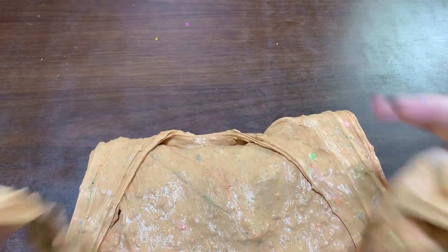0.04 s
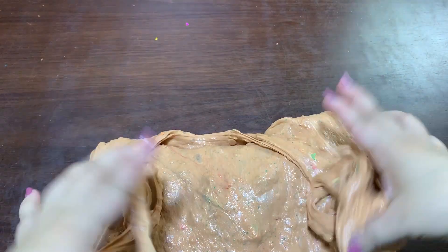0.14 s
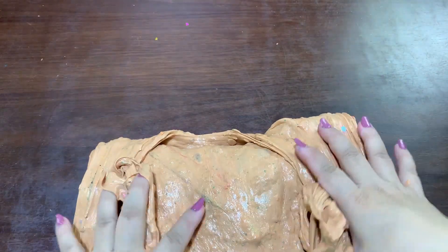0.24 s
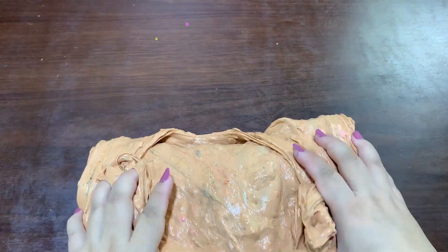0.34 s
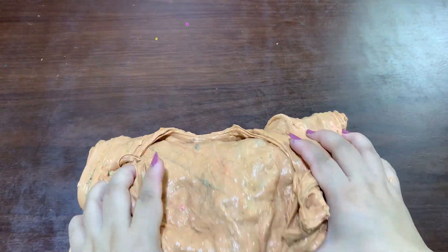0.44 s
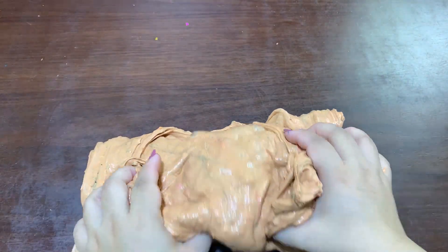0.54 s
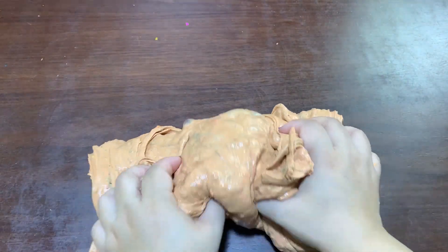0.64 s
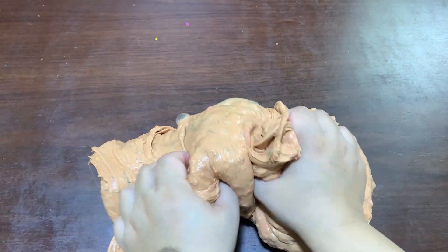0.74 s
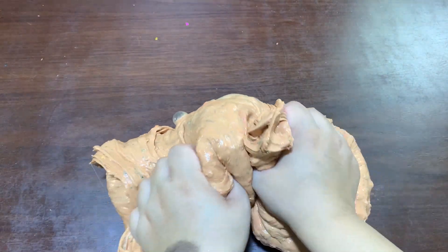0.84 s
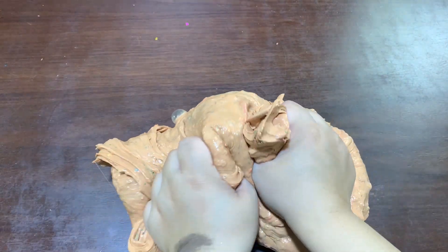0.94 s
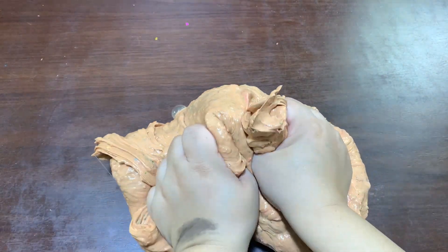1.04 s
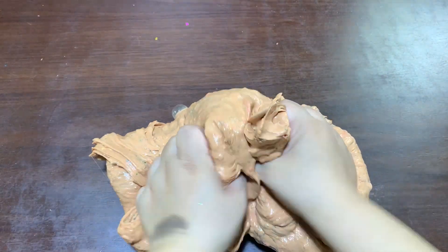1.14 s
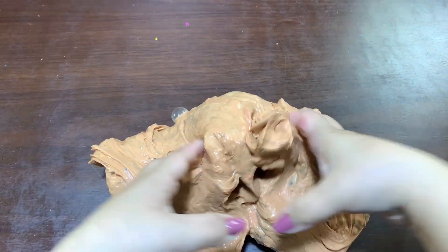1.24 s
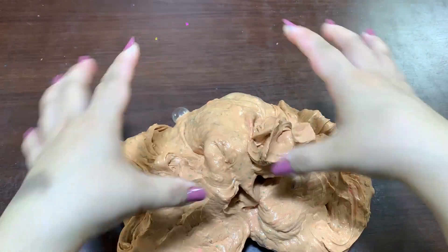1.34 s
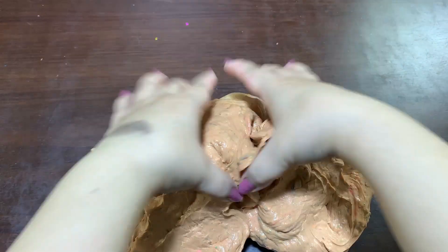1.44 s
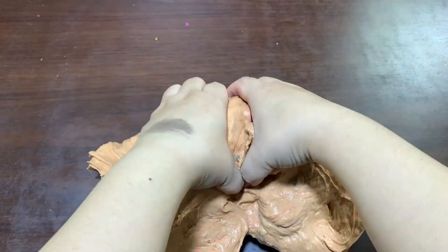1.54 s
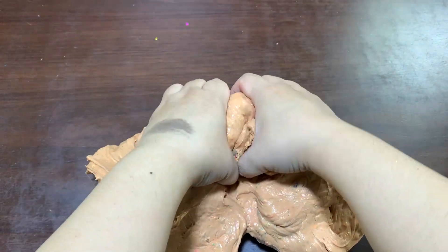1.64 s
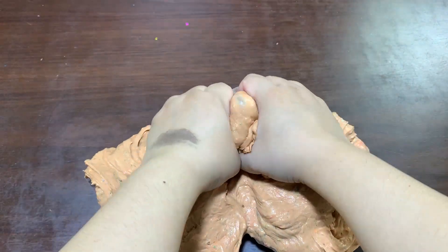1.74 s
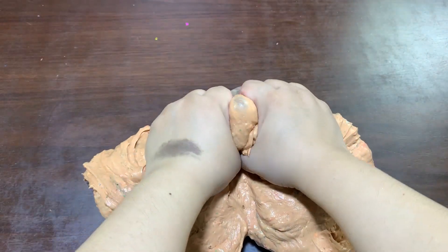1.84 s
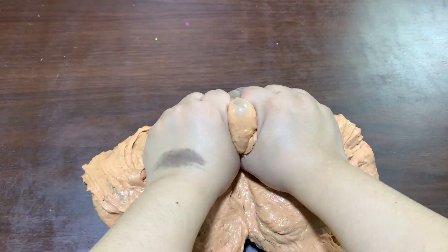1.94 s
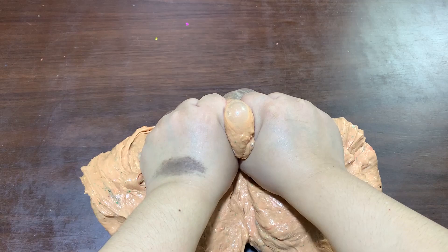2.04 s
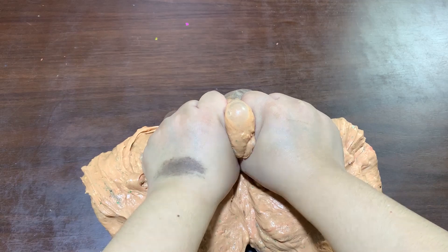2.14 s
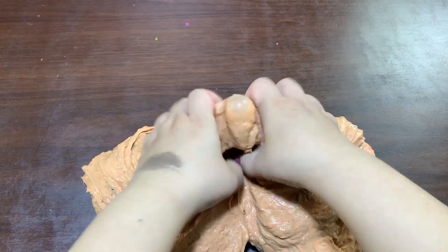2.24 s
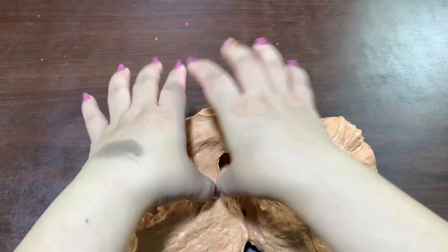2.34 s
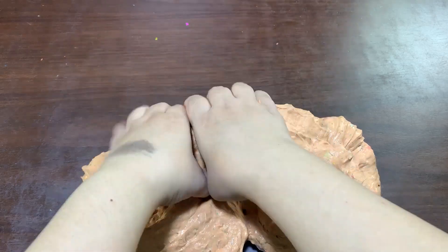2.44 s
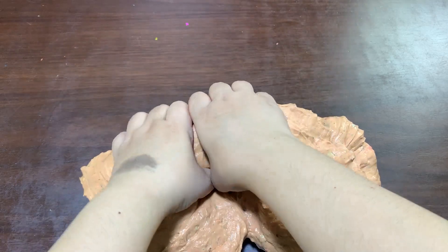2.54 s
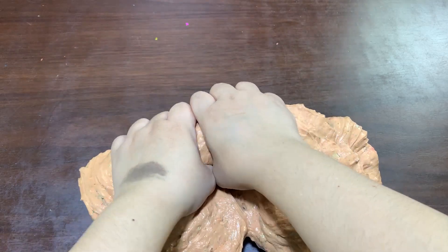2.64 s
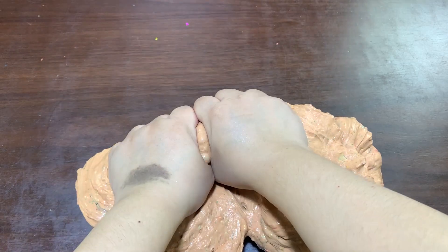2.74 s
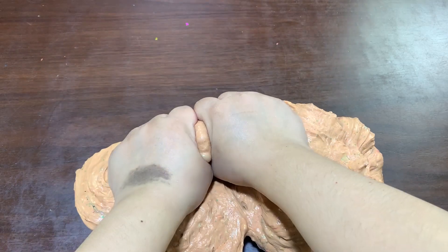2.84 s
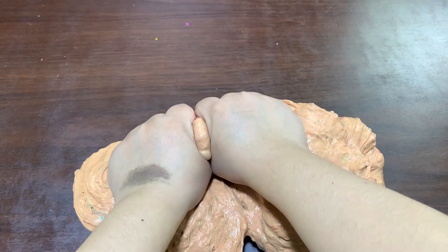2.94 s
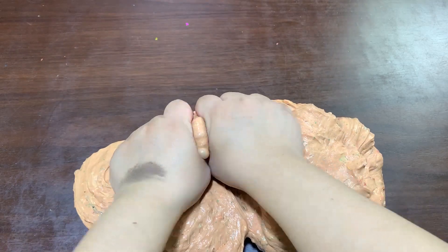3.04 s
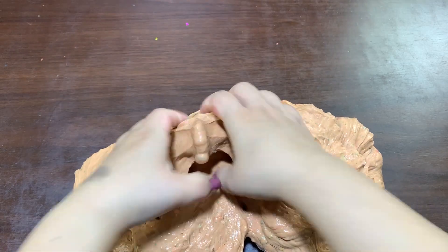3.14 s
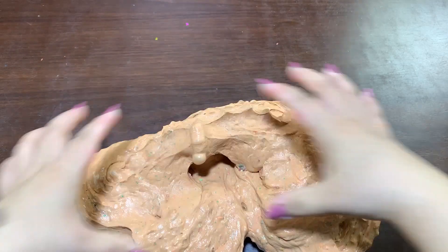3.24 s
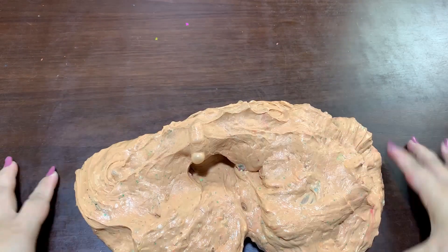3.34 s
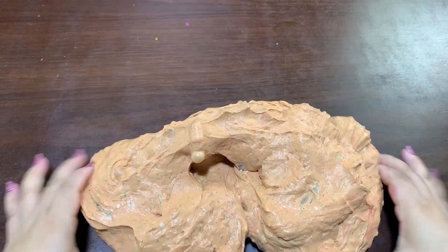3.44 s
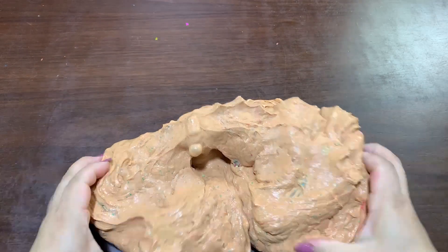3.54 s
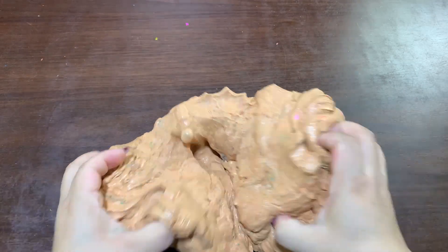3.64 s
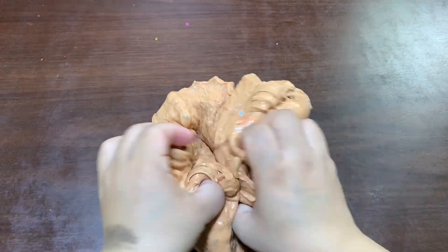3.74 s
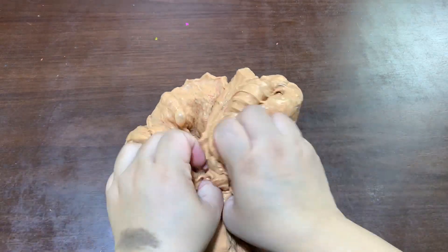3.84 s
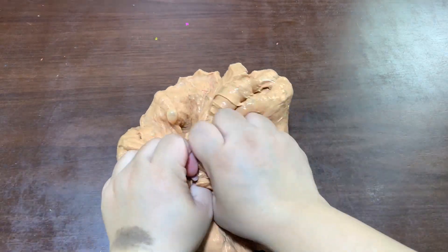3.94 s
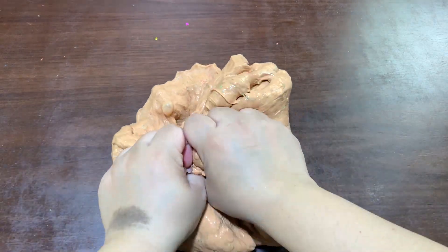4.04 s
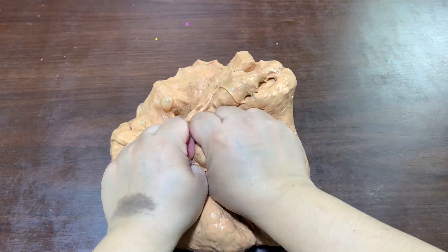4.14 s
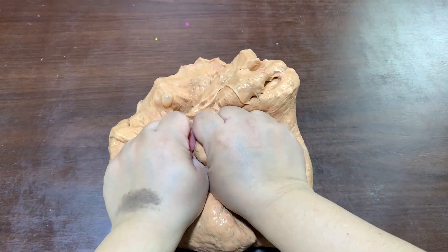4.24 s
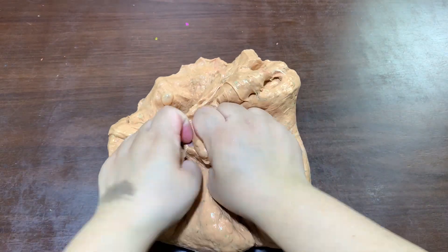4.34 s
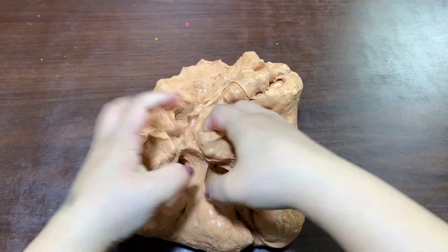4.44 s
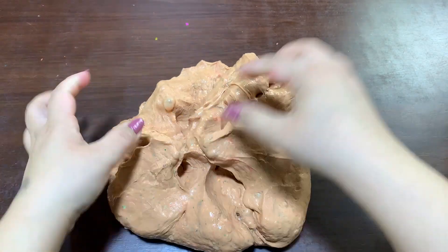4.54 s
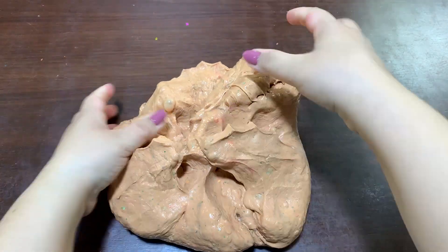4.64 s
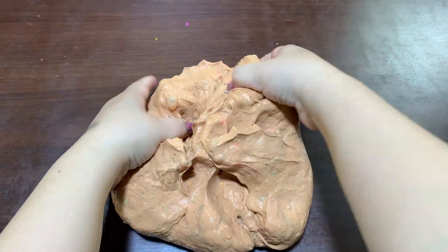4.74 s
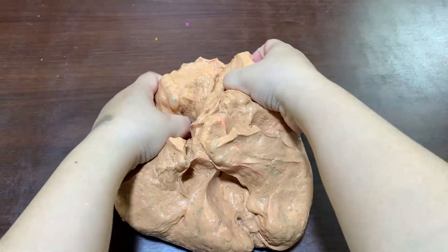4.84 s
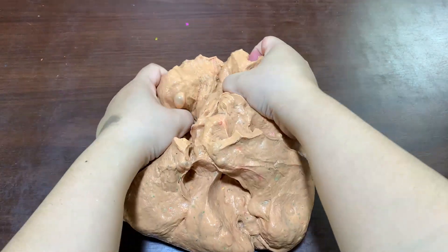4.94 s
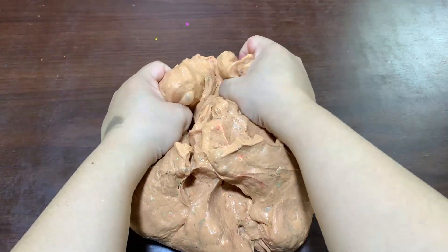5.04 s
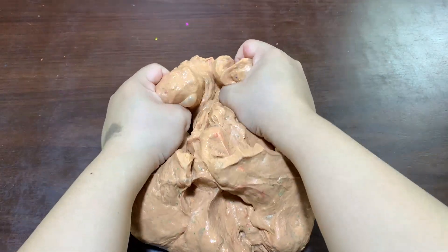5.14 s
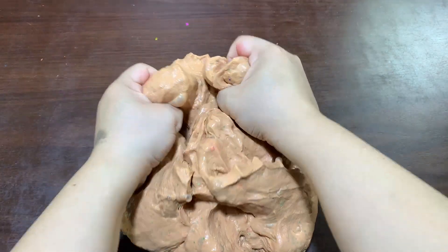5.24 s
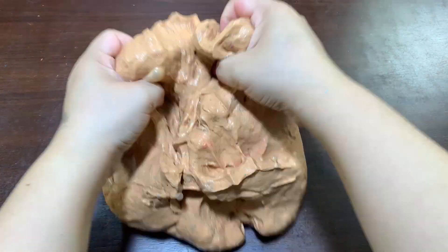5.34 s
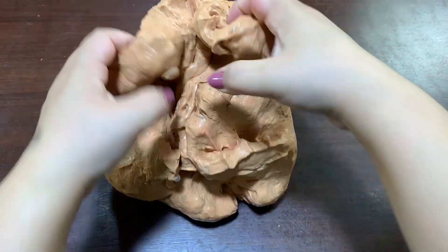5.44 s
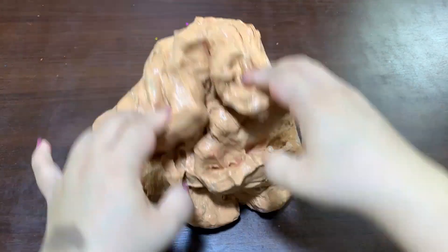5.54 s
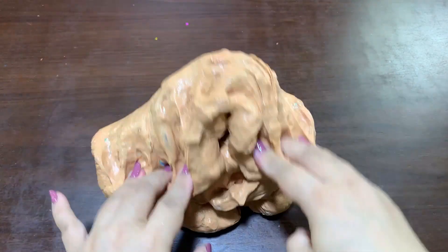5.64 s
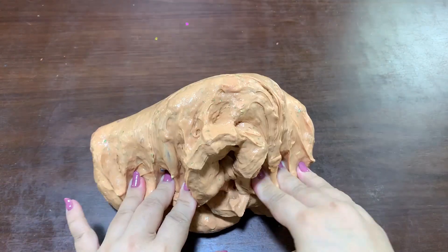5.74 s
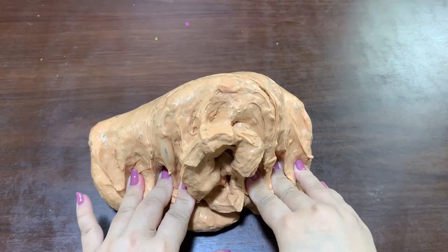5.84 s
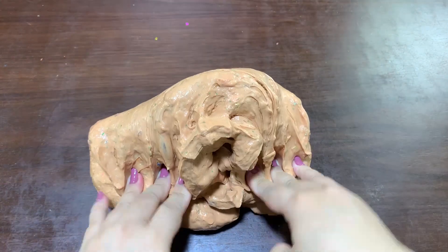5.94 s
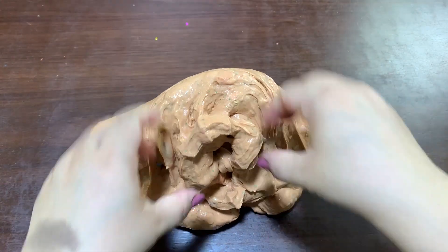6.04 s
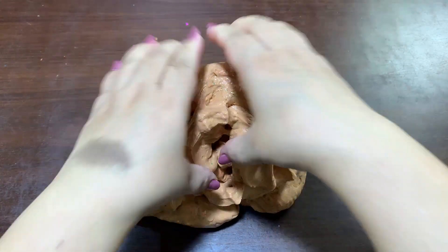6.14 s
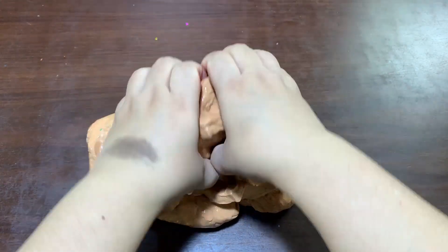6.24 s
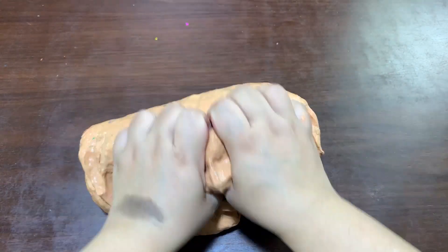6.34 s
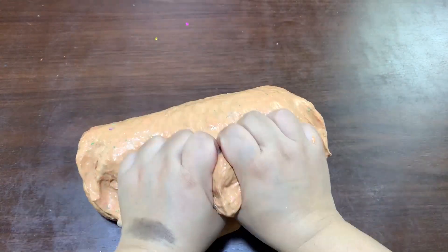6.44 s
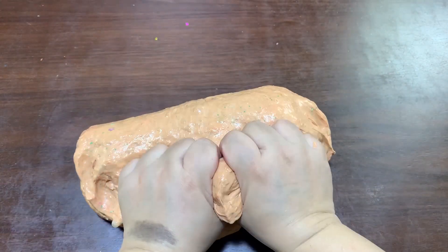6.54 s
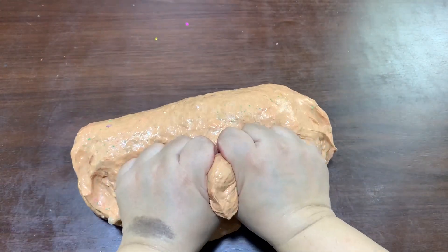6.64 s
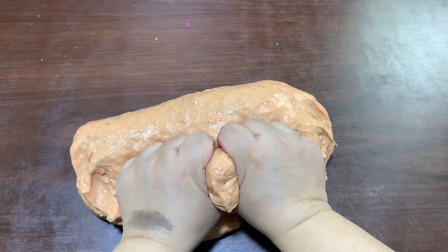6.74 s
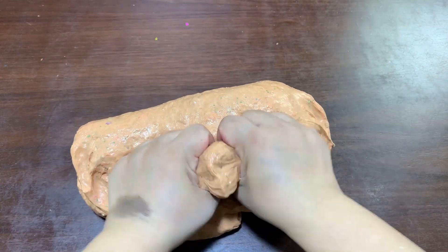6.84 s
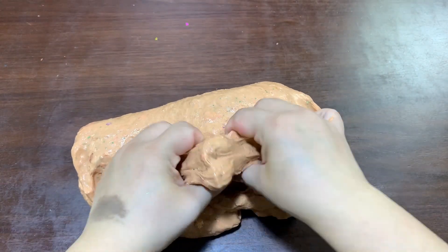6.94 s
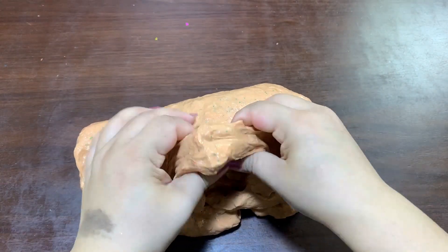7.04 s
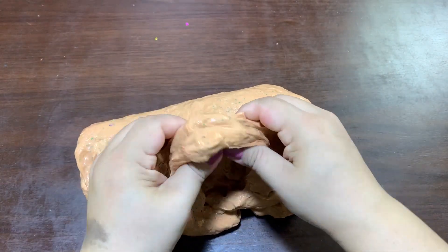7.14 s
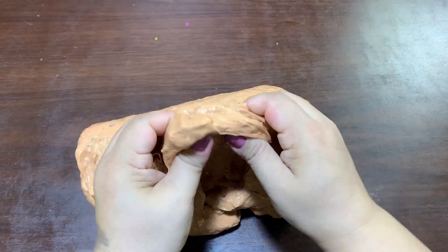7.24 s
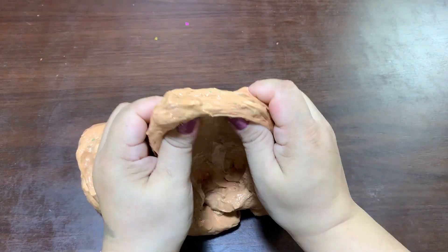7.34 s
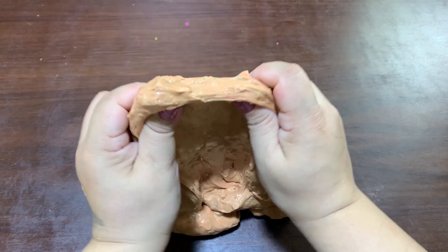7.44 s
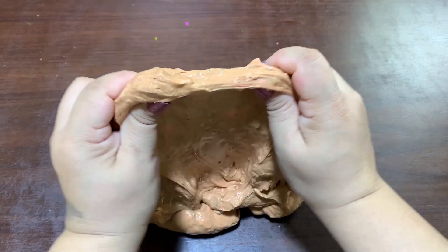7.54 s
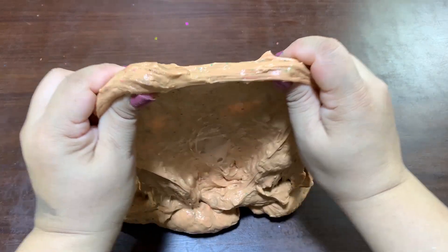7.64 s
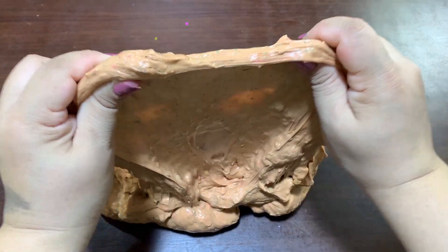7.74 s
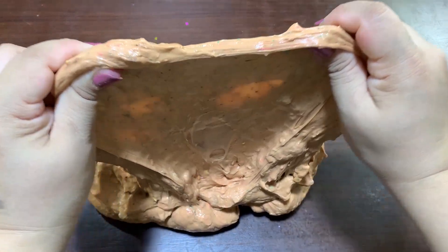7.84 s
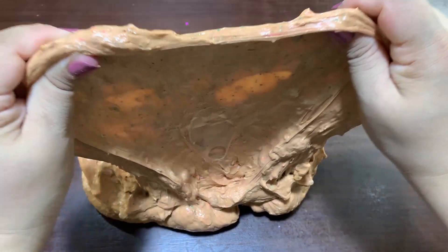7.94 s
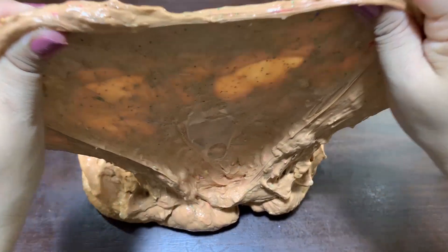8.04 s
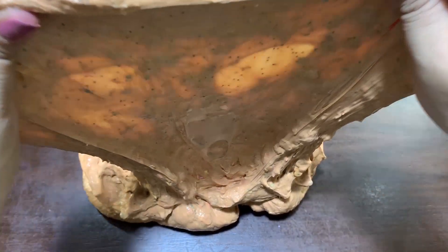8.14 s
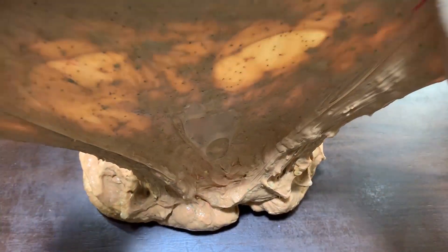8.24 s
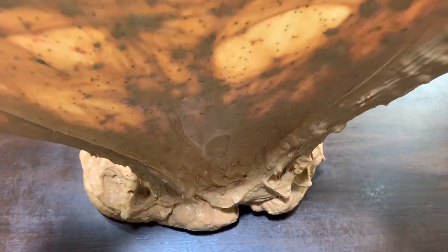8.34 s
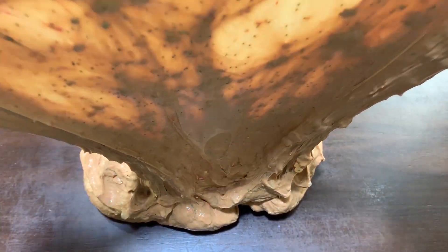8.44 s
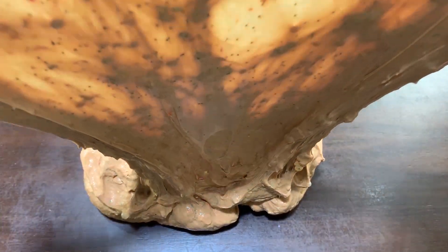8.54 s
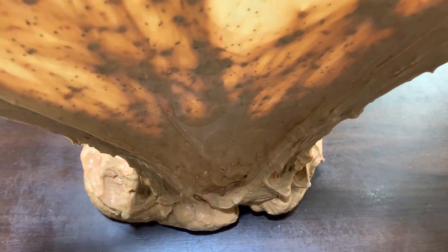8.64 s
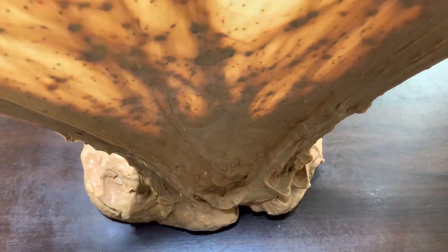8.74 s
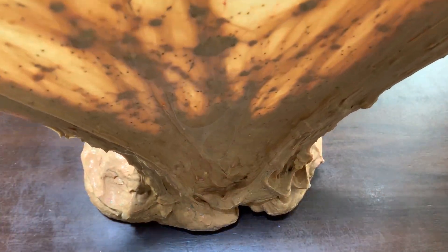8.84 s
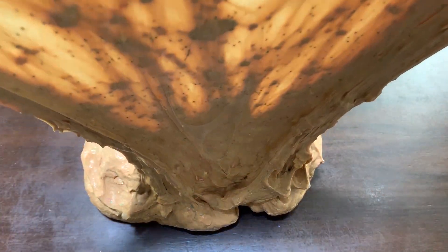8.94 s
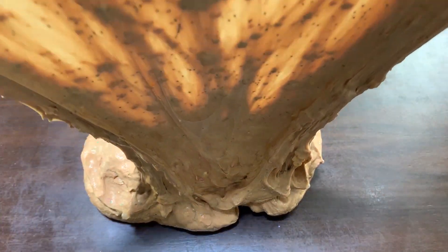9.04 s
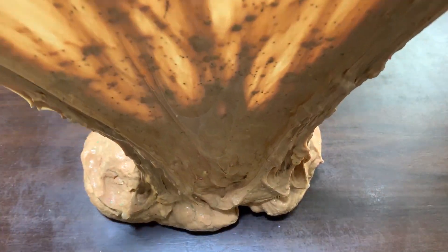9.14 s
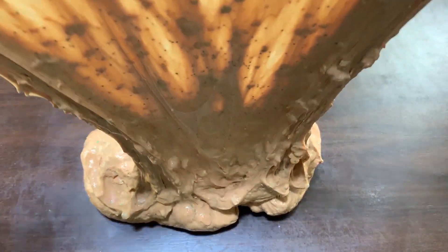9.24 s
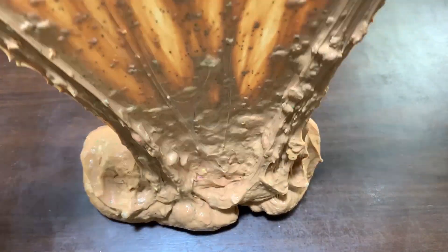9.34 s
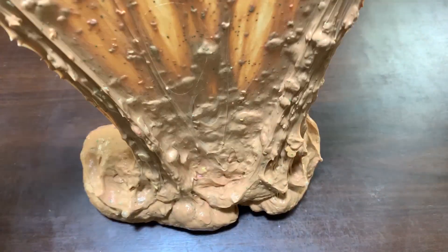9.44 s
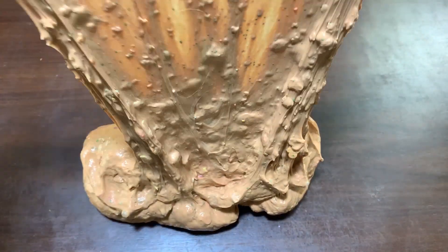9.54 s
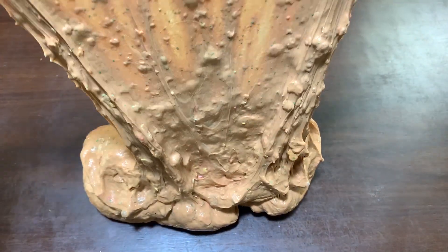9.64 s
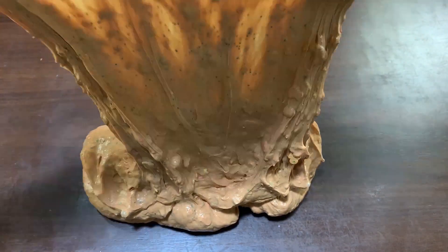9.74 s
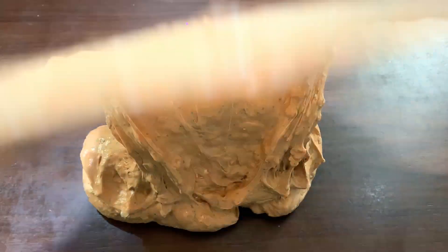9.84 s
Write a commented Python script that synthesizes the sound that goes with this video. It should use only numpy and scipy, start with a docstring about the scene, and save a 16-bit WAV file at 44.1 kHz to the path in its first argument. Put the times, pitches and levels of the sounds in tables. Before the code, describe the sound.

Close stereo microphone in a small room. Hands press soft slime on a wooden table: after a nearly silent start, bursts of wet squelch, crackle and short gurgles come with each squeeze. Sticky peels fizz, and air pockets pop sharply, loudest around three and four and a half seconds. Low table hums sit under the pushes. The last two seconds are almost silent, with tiny ticks and a faint creak.

```python
"""A small live room: on a wooden table, two hands squeeze, fold and stretch soft slime close to a stereo microphone.
Each squeeze drives air through the folds: swarms of short rings make wet squelches, a crackle and a skin fizz,
strings of clicks ring gliding gurgles, low tones sink in glugs, and larger air pockets pop singly as shaped noise.
The table hums low when the hands lean on it, over steady room rumble and hiss.
At the end the slime is pulled into a nearly silent sheet that creaks faintly."""
import sys
import numpy as np
from scipy import signal
from scipy.fft import rfft, irfft, next_fast_len
from scipy.io import wavfile

SR = 44100
rng = np.random.default_rng(int(sys.argv[2]) if len(sys.argv) > 2 else 0)


def put_to_file(sound):
    """Save the sound as 16-bit audio at rate SR, in the file named by the first command-line argument."""
    columns = np.atleast_2d(sound).T  # one column per channel
    safe = np.clip(columns, -1, 1)
    whole_steps = np.round(safe * 32767)
    wavfile.write(sys.argv[1], SR, whole_steps.astype(np.int16))


N = 435708  # length in samples

# The hands work a little left of the microphone: lead of the left port and its spread.
LEAD_MS, LEAD_SPREAD_MS = 0.085, 0.044


def amp(db):
    """Decibels to gain."""
    return 10 ** (np.asarray(db) / 20)


def unit(x):
    """Scales to an rms of 1."""
    return x / np.sqrt(np.mean(x ** 2) + 1e-20)


def burst(sound, db):
    """Gives a short sound the energy of one millisecond at the level db."""
    return amp(db) * sound * np.sqrt(SR / 1000 / np.sum(sound ** 2))


def read(points, hz):
    """Reads a table of (Hz, value) on a log-frequency axis."""
    f, value = np.transpose(points)
    return np.interp(np.log(hz + 1), np.log(f + 1), value)


def add(mix, s, sound):
    """Adds a stereo sound to the mix at time s."""
    part = mix[:, round(s * SR):][:, :sound.shape[1]]
    part += sound[:, :part.shape[1]]


def wander(per_s):
    """Smooth chance that takes a new course so many times a second."""
    knots = rng.standard_normal(2000)
    return np.interp(np.arange(N) / SR * per_s, np.arange(len(knots)), knots)


def causal(gain):
    """Gives a gain curve the phase of a thing that rings only after it is struck (minimum phase)."""
    both_sides = np.r_[gain, gain[-2:0:-1]]
    log_gain = np.log(np.maximum(both_sides, 1e-5))
    return np.exp(np.conj(signal.hilbert(log_gain)))[:len(gain)]


def at_ports(sound, lead_ms, pan_db=0):
    """A sound from under the hands reaches the left port of the microphone slightly before the right one."""
    hz = np.fft.rfftfreq(len(sound), 1 / SR)
    delay = np.exp(-2j * np.pi * hz * lead_ms / 1000)
    right = irfft(rfft(sound) * delay, len(sound))
    return np.array([sound * amp(pan_db / 2), right * amp(-pan_db / 2)])


def diffuse(pair):
    """Sound from all sides is more alike at the two ports in some bands than in others, least in the treble."""
    # Left-right likeness of diffuse sound. Each row: frequency in Hz, likeness from 0 to 1.
    likeness = [(60, 1), (150, 0.23), (300, 0.26), (640, 1), (1400, 0.013)]
    size = pair.shape[1]
    a, b = rfft(pair)
    alike = read(likeness, np.fft.rfftfreq(size, 1 / SR))
    right = alike * a + np.sqrt(1 - alike ** 2) * b
    return irfft(np.array([a, right]), size)


def air(level_db=-65.5):
    """The faint steady rumble and hiss of the room: noise shaped in frequency, then set to one level."""
    # Spectrum of the still room. Each row: frequency in Hz, relative density in dB per Hz.
    still_room = [(15, -34), (25, -11), (70, 8), (190, -2), (818, -14.5), (1040, -21), (1230, -19),
                  (1840, -19.5), (2550, -26.5), (5880, -30), (7920, -20.5), (9320, -26.5), (16000, -14.5)]
    size = next_fast_len(N, real=True)
    noise = rfft(diffuse(rng.standard_normal((2, size))))
    noise *= amp(read(still_room, np.fft.rfftfreq(size, 1 / SR)))
    return amp(level_db) * unit(irfft(noise)[:, :N])


def room(x, tail_db=-6, echo_db=-12, echo_s=.0041, build_s=0.0013):
    """One close reflection, and a diffuse tail that dies at its own pace in each band, the top treble first."""
    # Decay of the tail. Each row: frequency in Hz, time in seconds to fall by 60 dB.
    decay = [(100, 0.8), (250, 0.71), (600, 0.64), (1400, 0.43), (3700, 0.49), (8000, 0.45), (15000, 0.17)]
    # Colour of the tail. Each row: frequency in Hz, relative level in dB.
    colour = [(60, 1.5), (200, -6), (400, -1.5), (1000, -0.5), (3500, 2.5), (8000, 3), (15000, 0.5)]
    sparse = rng.standard_normal((2, SR)) * (rng.random((2, SR)) < .15)
    hz, t, z = signal.stft(diffuse(sparse), SR, nperseg=256)
    fading_db = read(colour, hz)[:, None] - 60 * t / read(decay, hz)[:, None]
    tail = signal.istft(z * amp(fading_db), SR, nperseg=256)[1]
    tail *= 1 - np.exp(-(np.arange(tail.shape[1]) / SR / build_s) ** 2)
    tail *= amp(tail_db) / np.linalg.norm(tail[0])
    tail[:, round(echo_s * SR)] += amp(echo_db)
    return signal.fftconvolve(x, tail, axes=1)[:, :N]


def table(rise_s=0.018, push_db=6, ports_db=1):
    """Soft pushes swell the low modes of the table top, which then die away."""
    # The hands lean on the table. Each row: start in seconds, level in dB before push_db.
    pushes = [(0.662, -34.5), (0.757, -33), (0.838, -40.5), (1.674, -36.5), (1.978, -36), (2.719, -33.5),
              (2.922, -39.5), (3.683, -35), (3.865, -32.5), (3.91, -28.5), (4.884, -40.5), (4.963, -37.5),
              (5.202, -42.5), (5.723, -41.5), (6.71, -44.5), (7.351, -51), (9.665, -49.5)]
    # Modes of the table top. Each row: nominal frequency in Hz, relative level in dB, 60 dB decay in seconds.
    modes = [(69.6, -1.5, 0.56), (108.1, -6.5, 0.31)]
    out, t = np.zeros((2, N)), np.arange(SR // 2) / SR
    swell = 1 - np.exp(-(t / rise_s) ** 2)
    for s, db in pushes:
        hum = np.zeros(len(t))
        for hz, mode_db, t60 in modes:
            pushed_hz = hz * rng.uniform(0.87, 1.1)  # each push detunes the mode
            hum += amp(mode_db - 60 * t / t60) * np.sin(2 * np.pi * pushed_hz * t)
        add(out, s, at_ports(amp(db + push_db) * hum * swell, .08, ports_db * rng.normal()))
    return out


def cavity(pitch, width, tear_ms, chance, split=0.18, snap_db=-32, tear_share=.55, evenness=0.63,
           split_width=0.35, size=2048):
    """The skin tears in a quick ragged swell; the opened cavity rings briefly around its pitch.

    A split dips the ring at the pitch itself; width is in octaves, split_width is a fraction of width."""
    ms, hz = np.arange(size) / SR * 1000, np.fft.rfftfreq(size, 1 / SR)
    age = ms / (tear_ms * tear_share)
    tear = rfft(np.roll(chance[:size] * np.sqrt(age) * np.exp(-age), 8))
    tear /= abs(tear) ** evenness + 1e-9  # evens out the spectrum of the noise
    away = abs(np.log2((hz + 1) / pitch) / width)
    dip = 1 - split * np.exp(-(away / split_width) ** 2)
    ring = dip / (1 + away ** 4.5)
    snap = amp(snap_db) * width * hz / (hz + 600)  # a little broad treble
    return irfft(tear * causal(ring + snap)) * np.linspace(1, 0, size) ** 2


def creak(pitch_hz=1350, width=1.55, tear_ms=0.11):
    """One spot of the taut sheet sticks and slips in even ticks that run together into a faint buzz."""
    # Course of the creak. Each row: time in seconds, slips per second, level of a slip in dB over 1 ms.
    course = [(9.135, 66, -53), (9.17, 74, -49.5), (9.2, 134, -52.5), (9.228, 147, -59), (9.244, 250, -74),
              (9.3, 240, -70), (9.365, 220, -71)]
    s, rate, db = np.transpose(course)
    out, t = np.zeros((2, N)), np.arange(s[0], s[-1], 1 / SR)
    tick = cavity(pitch_hz, width, tear_ms, rng.standard_normal(2048))
    slips_so_far = np.floor(np.cumsum(np.interp(t, s, rate)) / SR + .6)
    for slip in t[np.diff(slips_so_far, prepend=0) > 0]:
        add(out, slip, at_ports(burst(tick, np.interp(slip, s, db)), 0.085))
    return out


def squeak(s=1.392, length=0.017, hz=5330, db=-34):
    """Air whistles briefly through a pinhole: one short sine."""
    out, t = np.zeros((2, N)), np.arange(int(length * SR)) / SR
    whistle = np.sin(2 * np.pi * hz * t) * np.hanning(len(t))
    add(out, s, at_ports(amp(db) * unit(whistle), 0.037))
    return out


def glugs(fall=0.47, flutter=.22, flutter_per_s=304.1, overtone_db=-8):
    """Air forced out of a large closing fold: a rough low tone that sinks."""
    # Folds that collapse. Each row: start in seconds, level in dB, first pitch in Hz, length in seconds.
    collapses = [(0.622, -54, 300.5, 0.089), (0.79, -47.5, 272, 0.087), (0.871, -54, 229, 0.071),
                 (1.024, -35, 519, 0.03), (1.966, -54.5, 212, 0.069), (4.888, -33.5, 271, 0.033),
                 (5.685, -40, 404, 0.062), (5.882, -38.5, 411, 0.046), (6.463, -37, 340.5, 0.076),
                 (6.865, -39.5, 505, 0.023), (7.362, -44, 293, 0.07), (9.602, -49, 200.6, 0.13)]
    out = np.zeros((2, N))
    for s, db, hz, length in collapses:
        done = np.arange(int(length * SR)) / (length * SR)
        roughness = np.exp(flutter * wander(flutter_per_s)[:len(done)])
        turns = np.cumsum(hz * fall ** done * roughness) / SR
        tone = np.sin(2 * np.pi * turns) + amp(overtone_db) * np.sin(4 * np.pi * turns)
        add(out, s, at_ports(amp(db) * unit(tone * np.sin(np.pi * done) ** 2), 0.096))
    return out


def resonate(x, hz, width):
    """A resonance of gain 1, width in Hz, that follows the pitch curve hz."""
    turn = np.exp(2j * np.pi * np.cumsum(hz) / SR)
    r = np.exp(-np.pi * width / SR)
    return 2 * (turn * signal.lfilter([1 - r], [1, -r], x / turn)).real


def gurgles(per_s=650, spread_db=4.5, edge_s=.004, waver=0.025, waver_per_s=150, size=22050):
    """Unequal bubbles pass unevenly and ring the gliding, wavering resonances of a narrow wet fold."""
    # Folds pressed shut. Each row: start and length in seconds, level in dB, first and last pitch in Hz.
    passages = [(1.027, 0.1, -47, 1510, 1090), (1.629, 0.019, -34, 2880, 2470),
                (1.68, 0.019, -34.5, 1800, 1520), (1.748, 0.014, -35.5, 3100, 2600),
                (2.154, 0.039, -27.5, 1040, 1130), (2.19, 0.079, -39, 1111, 1084),
                (2.664, .016, -37.5, 1670, 1850), (2.695, 0.05, -32.5, 1550, 1250),
                (3.573, 0.015, -33.5, 1730, 1650), (3.592, 0.069, -39.5, 1820, 1230),
                (4.854, .06, -40, 2300, 2130), (4.957, 0.021, -37.5, 1250, 1250),
                (5.888, 0.029, -42, 1510, 1300), (6.478, 0.064, -52.5, 1390, 1240),
                (7.66, .3, -70, 1650, 1550)]
    # Resonances of a fold. Each row: multiple of the pitch, width in Hz, relative level in dB.
    resonances = [(1, 413, -1.5), (1.45, 578, -10), (2.5, 1500, -12)]
    out, t = np.zeros((2, N)), np.arange(size) / SR
    for s, length, db, first_hz, last_hz in passages:
        glide = first_hz * (last_hz / first_hz) ** np.minimum(t / length, 1)
        hz = glide * np.exp(waver * wander(waver_per_s)[:size])
        flow = np.clip(np.minimum(t, length - t) / edge_s, 0, 1)  # the fold opens and shuts quickly
        passing = rng.random(size) < per_s / SR
        clicks = flow * passing * amp(spread_db * rng.standard_normal(size))
        sound = np.zeros(size)
        for k, width, mode_db in resonances:
            ringing = resonate(resonate(clicks, k * hz, width), k * hz, width)
            sound += amp(mode_db) * unit(ringing)
        # the level refers to the length of the gurgle, not to the whole buffer
        add(out, s, at_ports(amp(db) * unit(sound) * np.sqrt(length / t[-1]), LEAD_MS))
    return out


def gesture(t, s, hold, rise_db_per_s, fall_db_per_s, sag_db_per_s=0):
    """Level in dB of one hand movement: it swells until time s, holds or sags, then dies away."""
    age = t - s
    swell = rise_db_per_s * np.minimum(age, 0)
    sag = sag_db_per_s * np.clip(age, 0, hold)
    return swell - sag - fall_db_per_s * np.maximum(age - hold, 0)


def stirring(tilt, delay_s=0, peel_db=0, size=4000):
    """Level in dB at which squeezes, peels and seething together stir one size of bubble.

    A negative tilt is for large bubbles, 0 for small, positive for tiny; only squeezes are delayed."""
    # Hands squeeze or tug. Each row: time of full grip and hold in seconds, level in dB,
    # brightness in dB (above 0 more skin fizz, below 0 more deep squelch), scaled by the tilt.
    squeezes = [(.275, 0.0087, -61, -7), (.595, 0.021, -43, 4), (.64, 0.017, -51.5, -5),
                (0.809, 0.17, -52, 0), (.95, 0.055, -40, -2), (1.035, 0.038, -40, 0.5),
                (1.13, 0.1, -44.5, -1.5), (1.607, .015, -53, -2.5), (1.638, 0.067, -31.5, -1),
                (1.745, 0.0092, -40.5, -3), (1.945, 0.15, -50.5, 1), (2.16, 0.053, -37, -2),
                (2.668, 0.0082, -39.5, 1), (2.703, 0.026, -32.5, -1), (3.552, 0.012, -40, 0),
                (3.585, 0.041, -34.5, 0), (3.975, 0.1, -40.5, -1), (4.872, 0.032, -30, 1),
                (4.953, 0.0035, -35, 3), (5.214, 0.015, -48, 2), (5.72, 0.086, -43.5, 2),
                (5.883, 0.0046, -36.5, 6), (6.475, 0.0047, -41.5, 5), (6.87, 0.08, -47, 2),
                (7.305, 0.034, -44.5, -2), (7.355, 0.027, -39, 4), (7.42, 0.048, -45, 3),
                (7.92, 0.1, -63, 7), (9.22, 0.13, -71, -8), (9.495, 0.16, -72, -14)]
    # Fingers pull free of the tacky surface. Each row: start and length in seconds, level in dB,
    # brightness in dB (above 0 more fizz, below 0 more crackle).
    peels = [(1.238, 0.16, -48.5, 1), (2.24, 0.14, -45, -4.5), (2.39, 0.11, -41.5, 2.5),
             (2.94, 0.19, -43, -2.5), (3.157, 0.04, -35, 2.5), (3.232, 0.24, -44, 3.5),
             (4.159, 0.57, -46.5, 0), (4.469, 0.083, -35, 1), (4.55, 0.15, -53, 6),
             (5.311, 0.47, -43.5, 2.5), (5.575, 0.075, -34.5, 3.5), (5.93, 0.19, -50, 2.5),
             (6.721, 0.13, -52.5, 0.5), (6.988, 0.1, -42.5, -2), (7.09, 0.11, -44, 2.5),
             (9.768, 0.11, -67.5, 12.5)]
    # Quiet seething while worked, and rest before and in the stretch. Each row: time in seconds, level in dB.
    seethe = [(0, -75.5), (.45, -76.5), (.7, -63), (7.5, -60), (8.25, -78), (9.88, -79.5)]
    t = np.linspace(0, N / SR, size)
    levels = [np.interp(t, *np.transpose(seethe))]
    for s, hold, db, bright_db in squeezes:
        shape = gesture(t, s + delay_s, hold, rise_db_per_s=365.5, fall_db_per_s=264)
        levels.append(db + tilt * bright_db + shape)
    for s, length, db, bright_db in peels:
        # a peel catches, weakens and lets go
        shape = gesture(t, s, length, rise_db_per_s=648.5, fall_db_per_s=345, sag_db_per_s=9)
        tint_db = bright_db if tilt > 0 else -bright_db
        levels.append(db + peel_db + tint_db + shape)
    power = np.sum(amp(levels) ** 2, axis=0)
    return np.interp(np.arange(N) / SR, t, 10 * np.log10(power))


def bubbles(sizes, level_db, per_s, cycles, spread_db, glide, patch_db, lead_ms=0.087, lead_spread_ms=0.086,
            count=24):
    """A swarm of short gliding rings, mostly faint and a few loud; each size comes and goes in patches."""
    out = np.zeros((2, N))
    # a light touch bursts fewer bubbles
    odds = per_s / count / SR * np.clip(amp(level_db + 39.5) ** .5, .45, 1)
    for hz in np.geomspace(sizes[0][0], sizes[-1][0], count):
        age = np.arange(int(6 * cycles * SR / hz) + 32) * hz / SR / cycles
        bend = np.exp(glide * rng.uniform(-0.3, 1) * np.minimum(age, 2))
        ring = np.sin(2 * np.pi * cycles * age * bend) * np.exp(-age)
        chance, patches = rng.random(N), np.minimum(wander(50), 1.5)
        at = np.flatnonzero(chance < odds)
        rarity = np.minimum(-np.log(chance[at] / odds[at]), 3.8)
        strength = amp(spread_db * rarity + patch_db * patches[at])
        clicks = np.zeros(N)
        clicks[at] = (-1) ** at * strength / np.sqrt(odds[at])
        heard = at_ports(ring, lead_ms + lead_spread_ms * rng.normal())
        swarm = signal.oaconvolve(clicks[None], heard, axes=1)[:, :N]
        out += amp(read(sizes, hz)) * unit(swarm)
    return unit(out) * amp(level_db)


def kneading(squelch_db=-1.0, crackle_db=-2.5, fizz_db=-2):
    """Large folds squelch, small bubbles crackle and the tacky skin fizzes as it parts."""
    # Large folds, small bubbles and tacky skin. Each row: ring frequency in Hz, relative level in dB.
    fold_sizes = [(110, -12.5), (170, -4), (250, -4), (450, -3.5), (700, -6.5)]
    bubble_sizes = [(700, -12), (1250, 5), (2200, 1), (3400, 4.5), (5000, 3.5)]
    skin_sizes = [(5000, -9.5), (8000, -6.5), (11000, -3), (15000, 2)]
    # the skin is touched first, the large folds give way last; peeling hardly stirs the folds
    folds = stirring(-0.47, delay_s=0.014, peel_db=-19.5)
    small = stirring(0)
    skin = stirring(0.9, delay_s=-0.0052)
    squelch = bubbles(fold_sizes, folds + squelch_db, per_s=800, cycles=0.97, spread_db=4.0,
                      glide=0.024, patch_db=1.5, count=14)
    # a burst bubble in soft slime rings for only about two cycles
    crackle = bubbles(bubble_sizes, small + crackle_db, per_s=3000, cycles=2.2, spread_db=3.0,
                      glide=0.066, patch_db=7.5, count=20)
    fizz = bubbles(skin_sizes, skin + fizz_db, per_s=7000, cycles=3.6, spread_db=2.0,
                   glide=0.0051, patch_db=3.5, count=18)
    return squelch + crackle + fizz


def ticks(per_s=12, over_crackle_db=7, spread_db=4.5, max_db=-38, middle_hz=3000, spread_octaves=0.93,
          width=0.37, tear_ms=0.11, count=200):
    """Small air pockets give way at random, louder the more the slime is stirred, up to a limit."""
    out, stirred_db = np.zeros((2, N)), stirring(0)
    times = np.cumsum(rng.exponential(1, count)) / per_s
    for s, chance in zip(times, rng.standard_normal((count, 2051))):
        if s * SR < N:
            db = min(stirred_db[int(s * SR)] + over_crackle_db + spread_db * chance[-1], max_db)
            pitch = middle_hz * 2 ** (spread_octaves * chance[-2])
            tick = cavity(pitch, width, tear_ms, chance)
            add(out, s, at_ports(burst(tick, db), LEAD_MS + LEAD_SPREAD_MS * chance[-3]))
    return out


def puff(chance, puff_hz=350, sag=0.74, sag_s=.005, decay_s=0.0038, size=2048):
    """The escaping air gives a low blip whose pitch sinks as the fold collapses."""
    t = np.arange(size) / SR
    hz = puff_hz * np.exp(0.16 * chance) * (1 - sag + 2 * sag * np.exp(-t / sag_s))
    swell = 1 - np.exp(-t / 0.0008)
    return np.sin(2 * np.pi * np.cumsum(hz) / SR) * np.exp(-t / decay_s) * swell


def pops(burst_db=1.5):
    """Single air pockets burst with a torn ring and a puff: the direct sound, and what each throws into the room."""
    # Air pockets that burst. Each row: start in seconds, level in dB over 1 ms (before burst_db), cavity pitch
    # in Hz, width in octaves, split into two bands from 0 to 1, tearing time in ms (before tear_share),
    # puff of air in dB relative to the listed level, room send in dB.
    pockets = [(0.271, -45, 12000, 1.3, 0, 0.41, -21, 5), (0.803, -25.5, 5600, 1.03, 0, 0.47, -10, -3),
               (1.1757, -22.5, 840, 1.7, 0.3, 0.89, 3, -4.5), (1.2282, -22, 2980, 1.04, 0, 3.5, -7.5, 0),
               (1.328, -35.5, 970, 0.93, 0.1, 2.3, -12, 0.5), (1.396, -29, 2460, 1.14, 0.3, 3, -22.5, 1.5),
               (1.6607, -21, 1760, 0.51, 0.5, 0.6, -6, 4), (1.674, -9.5, 3330, 1.06, 0, 1.3, -11.5, -7.5),
               (2.1213, -11.5, 1930, 0.59, 0, 0.25, -15.5, -1.5), (2.126, -18.5, 1200, 0.64, 0, 1, -5, 2),
               (2.154, -26, 4500, 1.4, 0.1, 4.3, -16, -5.5), (2.1753, -20.5, 1500, 1.93, 0.7, 1.5, -2, 2),
               (2.1792, -16.5, 880, 0.83, 0.2, 2.6, 0.5, 0.5), (2.383, -21.5, 2770, 1.6, 0, 0.87, -9, 5.5),
               (2.4826, -16, 2720, 1.65, 0.15, 1.6, -14, 4),
               (2.5338, -15.5, 13100, .35, .2, 0.61, -31, 5.5),
               (2.928, -4.5, 3080, 0.59, 0.7, 0.15, -23, -8.5), (2.939, -12.5, 1380, 0.56, 0, 2.4, -6, 0.5),
               (2.941, -16, 3400, 0.44, .1, 3, -19, -1.5), (3.115, -13, 4550, 0.79, 0.5, 0.73, -11, 0),
               (3.1739, -11.5, 3370, 0.57, 0, 0.22, -8.5, -1), (3.293, -17.5, 7600, 1.9, 0, 1.1, -19.5, 8),
               (3.3771, -14, 4060, 1.9, 0, 3.1, -11, 2), (4.069, -17, 9500, 1.45, 0, 0.19, -34, -5.5),
               (4.156, -15, 2360, 1.07, 0.2, 0.41, -10, -2),
               (4.1665, -14.5, 2760, 1.27, 0.7, 1.1, -4.5, -9.5),
               (4.2462, -24.5, 5850, 4, 0.5, 0.22, -9.5, 1.5),
               (4.329, -23, 10910, 1.7, .2, 0.66, -23.5, -16),
               (4.4411, -22, 8700, 0.79, 0.1, 0.33, -19.5, 4), (4.4667, -1.5, 4970, 2.3, 0.1, 0.7, -22, -6),
               (4.477, -3.5, 4570, 0.76, 0, 0.26, -15, -1.5), (4.897, -23, 2150, 0.31, 0.1, 3.4, 0.5, 2.5),
               (5.217, -24.5, 2780, 1.3, 0.3, 2.2, -20, 5.5),
               (5.258, -18.5, 5440, 3.2, 0.7, 0.22, -18, -4.5), (5.2968, -17, 10000, 1.3, 0, 0.3, -29, -12),
               (5.388, -11.5, 1900, 1.15, 0.05, 1.06, -5.5, 0),
               (5.5048, -21, 13000, 0.95, 0, 0.4, -19.5, -17),
               (5.5355, -7, 13200, 0.67, 0.1, 0.21, -21, -5), (5.5706, -6, 8900, 2.37, 0, 0.99, -25, 1.5),
               (6.0784, -20.5, 3030, 0.93, 0.55, 1.5, -6.5, -8.5),
               (6.2434, -26, 4970, 5.5, 0.1, 0.41, -16.5, -3),
               (6.326, -17.5, 3920, 0.48, 0.04, 0.15, -19, -10.5),
               (6.529, -32.5, 1600, 0.55, .2, 0.75, -12, -7.5),
               (6.751, -26.5, 7500, 1.1, 0.7, 0.39, -20, -9), (6.7692, -23, 2500, 1.8, 0, 1.5, -7, 2.5),
               (6.9315, -19, 6660, 1.7, 0.4, 1.9, -18.5, -2), (6.9824, -11, 1450, 1.27, .35, 0.45, -7, -1),
               (7.0045, -33, 4970, .3, .1, 1, -20.5, 0), (7.0225, -26.5, 796, .5, .1, 1.3, -10.5, -8),
               (7.073, -21.5, 960, 0.75, 0, 2.3, -10.5, -2.5), (7.0829, -9.5, 4900, 1.64, .1, 1.9, -14, 2),
               (7.44, -33, 950, 0.57, .6, 2, -1, 6), (7.8502, -38.5, 4850, 0.84, 0, 0.6, -11, -1),
               (7.8878, -32, 13000, 0.48, .2, 0.79, -25, -4), (7.9245, -43, 4000, 2.3, 0.3, .5, -12, -10),
               (7.9432, -42.5, 1660, 0.9, .2, 3.4, -7, -3), (8.129, -50.5, 2587, 1.3, .2, 0.84, -19, 2.5),
               (8.3418, -43.5, 2400, 1.65, 0.26, 3.6, -4.5, -2.5),
               (8.7136, -54.5, 7750, .4, .1, 0.54, -23.5, -5)]
    direct, thrown = np.zeros((2, 2, N))
    chances = rng.standard_normal((len(pockets), 2051))
    for (s, db, pitch, width, split, tear_ms, puff_db, send_db), chance in zip(pockets, chances):
        torn = burst(cavity(pitch, width, tear_ms, chance, split), db + burst_db)
        blown = burst(puff(chance[-1]), db + puff_db)
        sound = at_ports(torn + blown, LEAD_MS + LEAD_SPREAD_MS * chance[-3], chance[-2])
        add(direct, s, sound)
        add(thrown, s, sound * amp(send_db))
    return direct, thrown


def scene(knead_send_db=1, small_send_db=-9.0):
    """Slime on the table, close by and thrown back by the room; the table hum and room air stay dry."""
    steady = table() + air()
    small = squeak() + creak() + ticks()
    slime = kneading() + glugs() + gurgles()
    direct, thrown = pops()
    sent = thrown + amp(knead_send_db) * slime + amp(small_send_db) * small
    return direct + slime + small + room(sent) + steady


def record(dry, edge_hz=16450):
    """The ports thin the deep bass and colour the top treble, peaks overload, and the band is limited."""
    # Colour of the microphone. Each row: frequency in Hz, gain in dB.
    port_colour = [(15, -18), (38, -2.5), (12100, 3), (13100, -19.5), (14200, 3.5), (15500, -1),
                   (16500, -17)]
    hz = np.fft.rfftfreq(8192, 1 / SR)
    port = irfft(causal(amp(read(port_colour, hz))))
    heard = signal.oaconvolve(dry, port[None], axes=1)[:, :N]
    heard = np.clip(heard, -1, 1)
    lowpass = signal.firwin(511, edge_hz, window=("kaiser", 9), fs=SR)
    return signal.oaconvolve(heard, lowpass[None], "same")


dry = scene()
out = record(dry)
put_to_file(out)
```